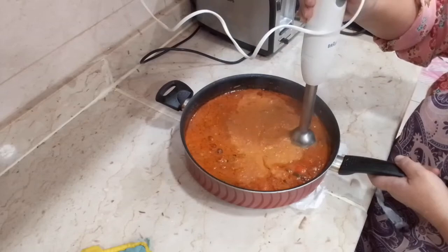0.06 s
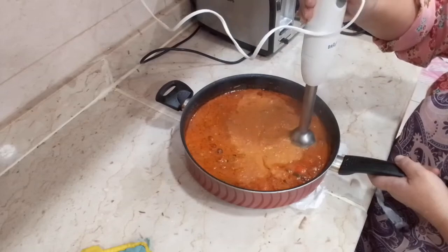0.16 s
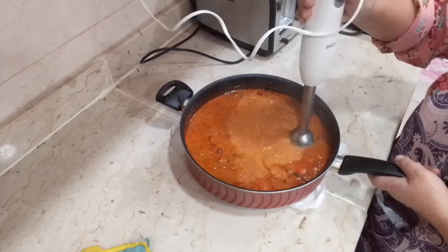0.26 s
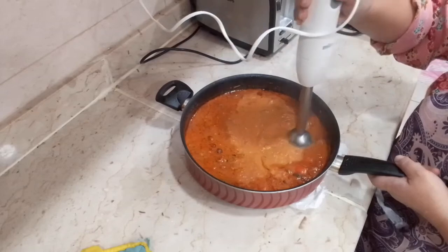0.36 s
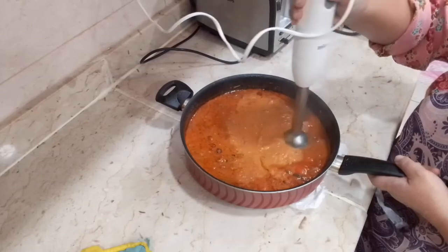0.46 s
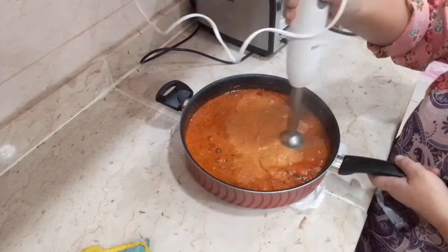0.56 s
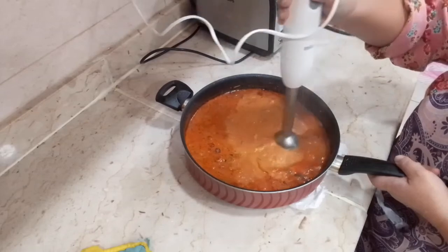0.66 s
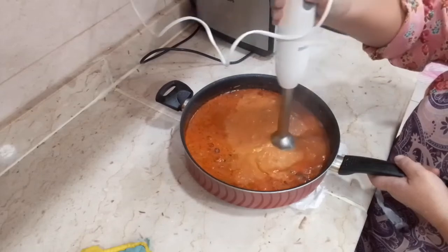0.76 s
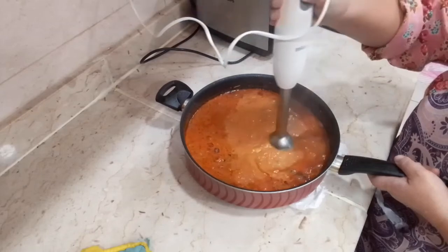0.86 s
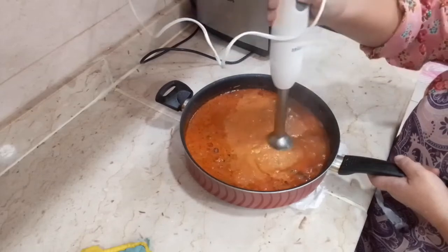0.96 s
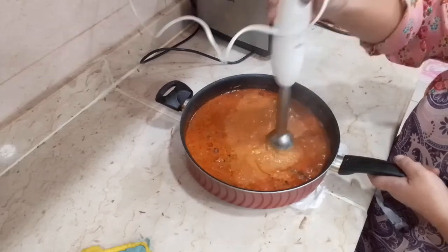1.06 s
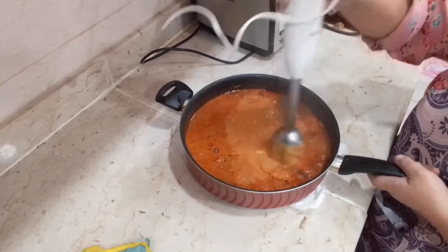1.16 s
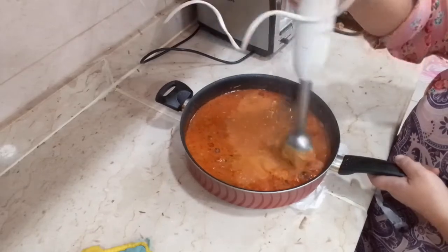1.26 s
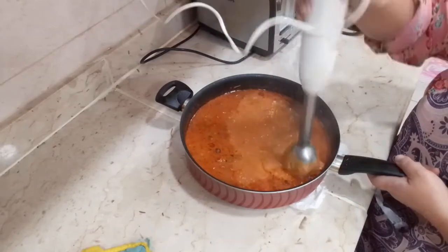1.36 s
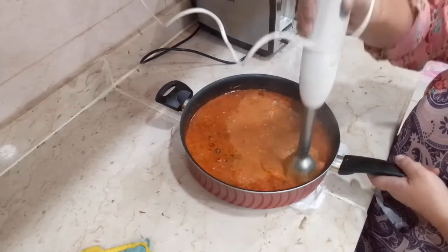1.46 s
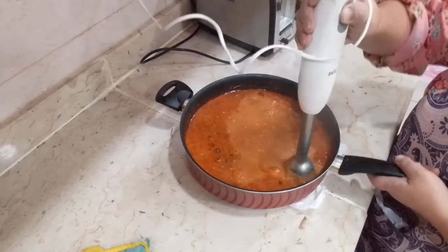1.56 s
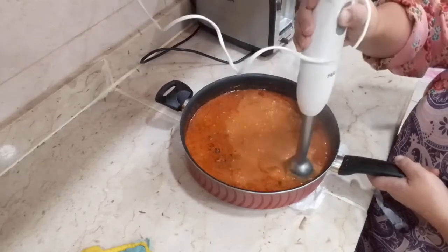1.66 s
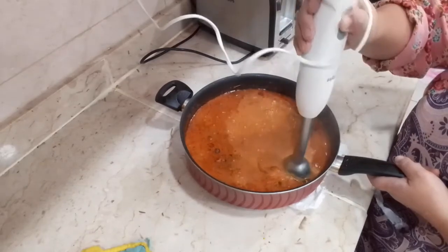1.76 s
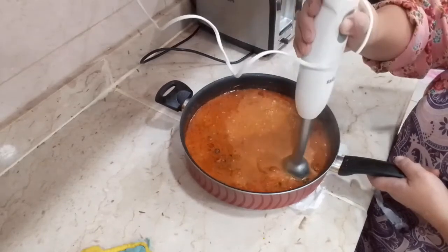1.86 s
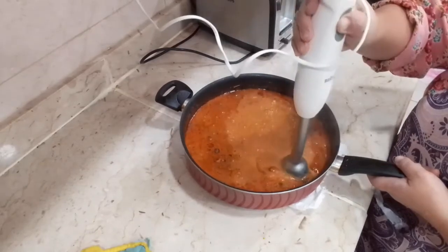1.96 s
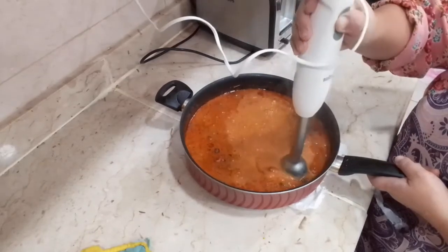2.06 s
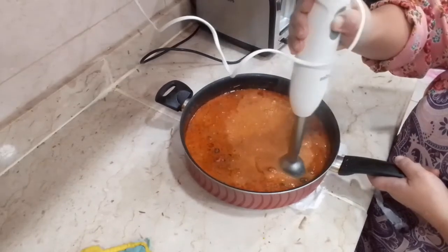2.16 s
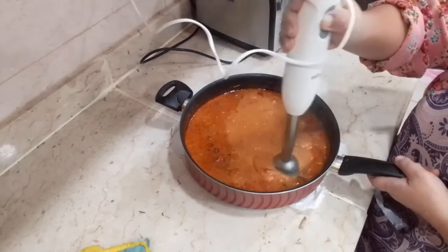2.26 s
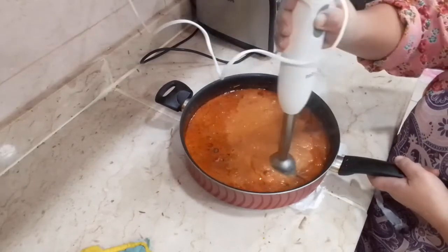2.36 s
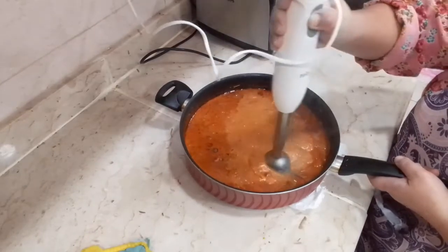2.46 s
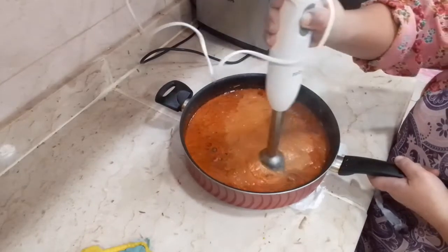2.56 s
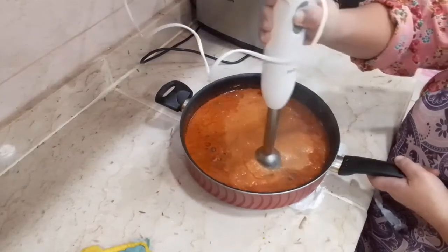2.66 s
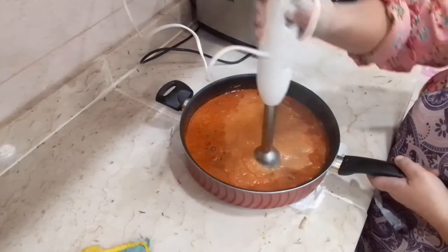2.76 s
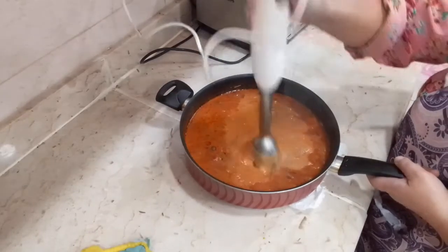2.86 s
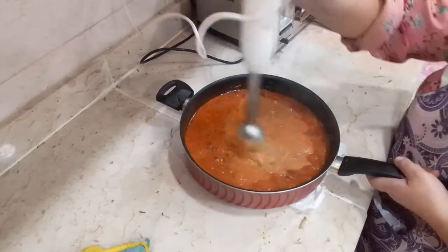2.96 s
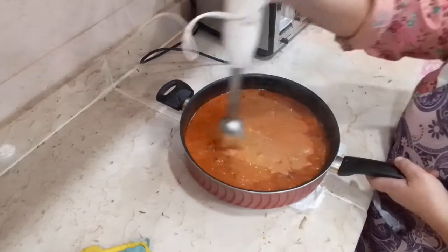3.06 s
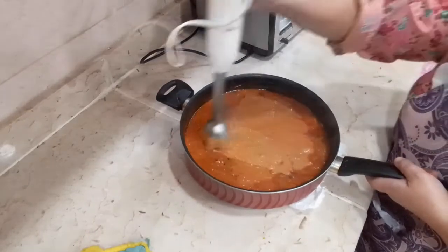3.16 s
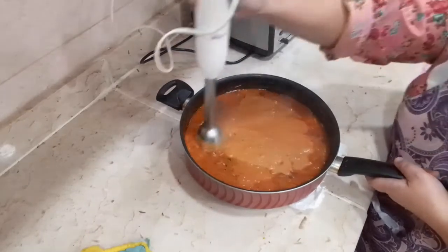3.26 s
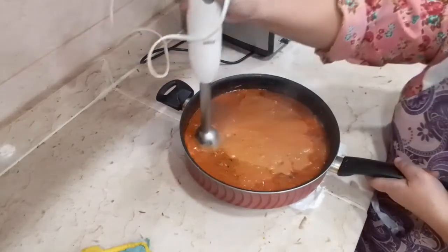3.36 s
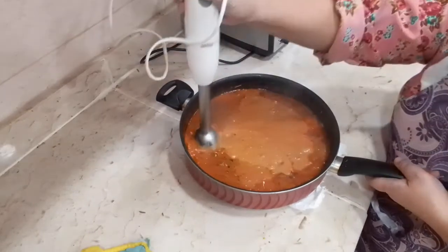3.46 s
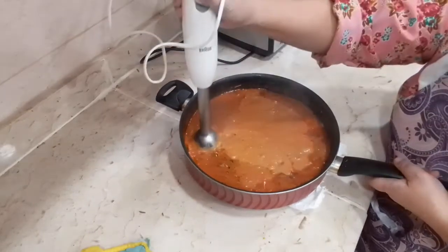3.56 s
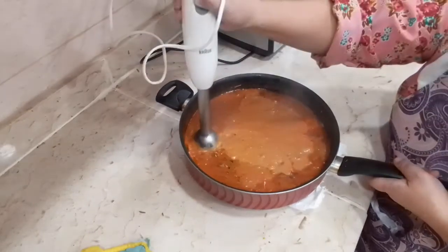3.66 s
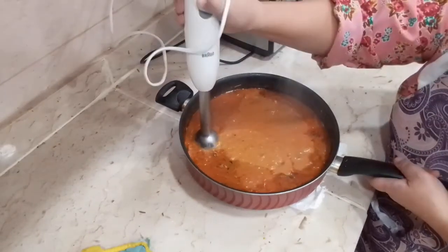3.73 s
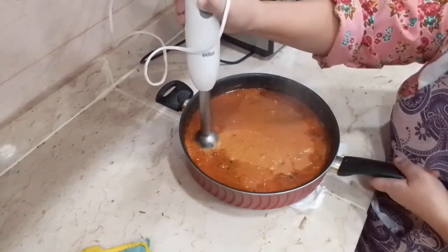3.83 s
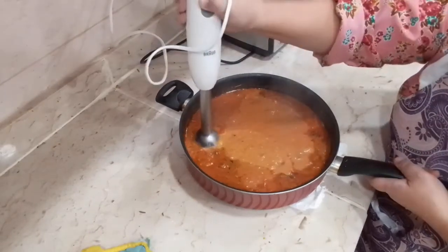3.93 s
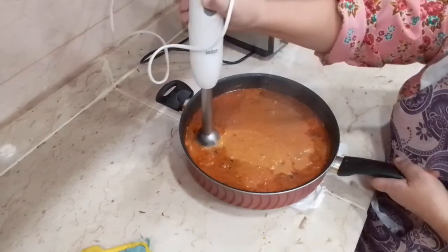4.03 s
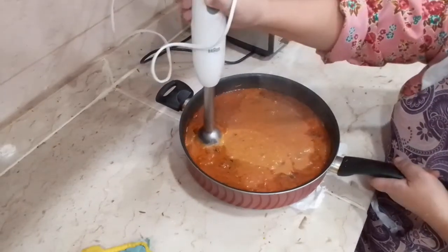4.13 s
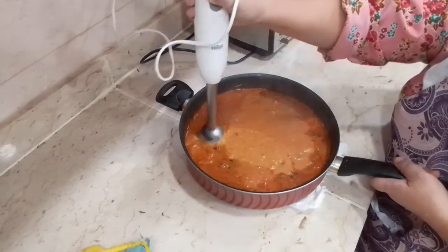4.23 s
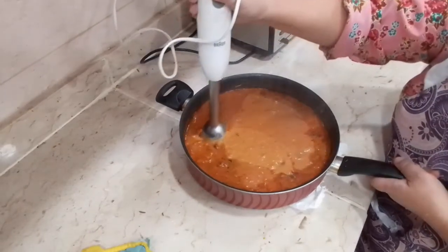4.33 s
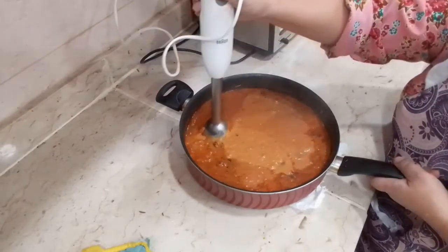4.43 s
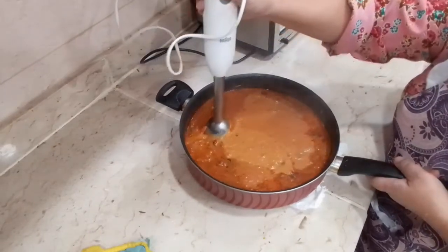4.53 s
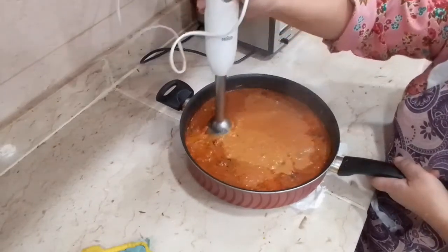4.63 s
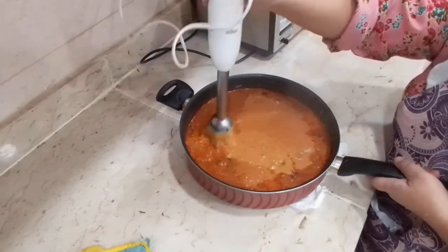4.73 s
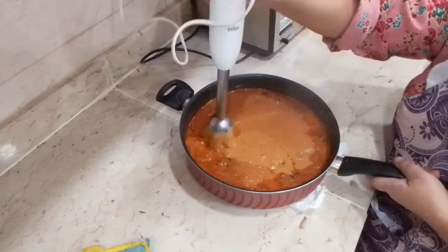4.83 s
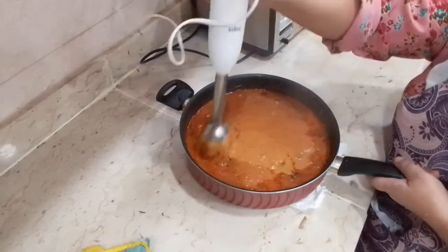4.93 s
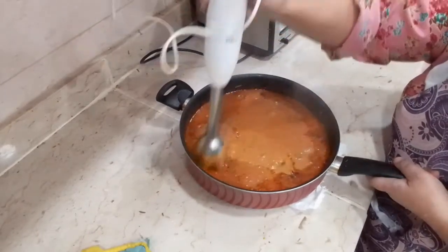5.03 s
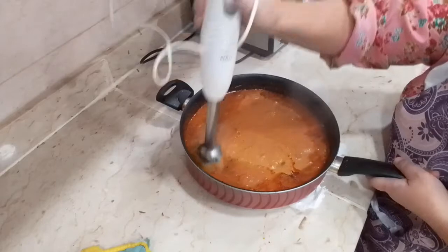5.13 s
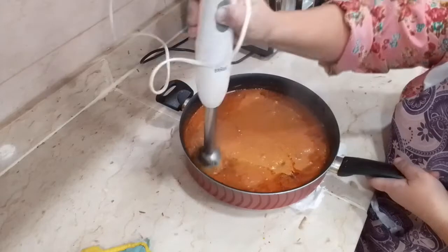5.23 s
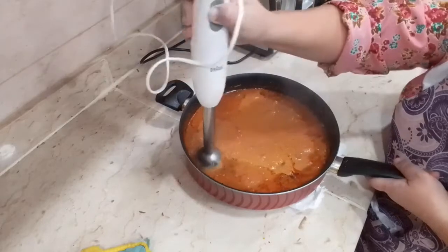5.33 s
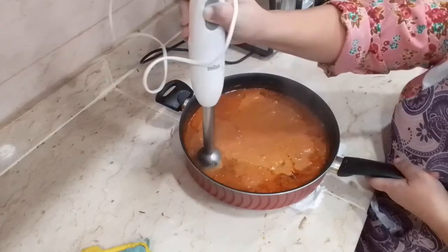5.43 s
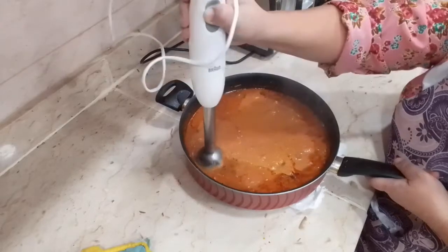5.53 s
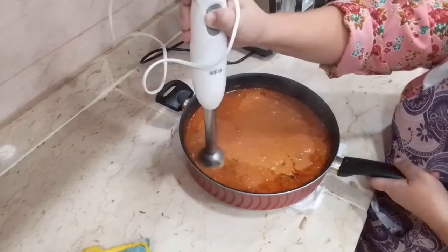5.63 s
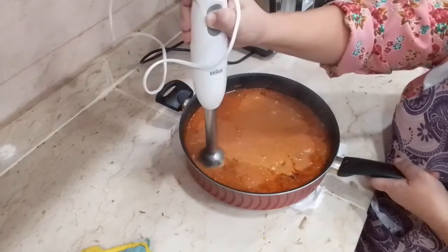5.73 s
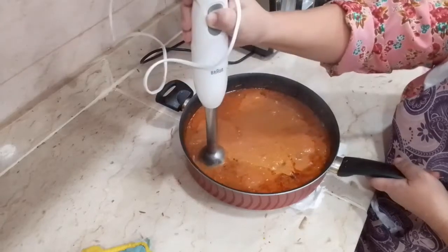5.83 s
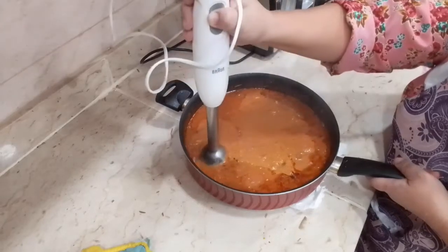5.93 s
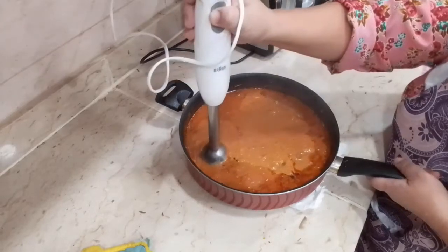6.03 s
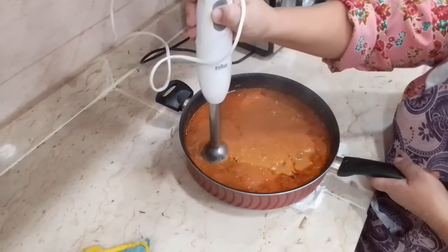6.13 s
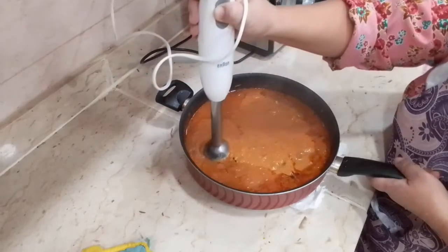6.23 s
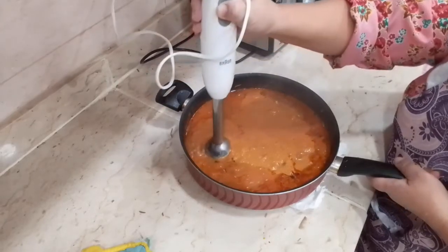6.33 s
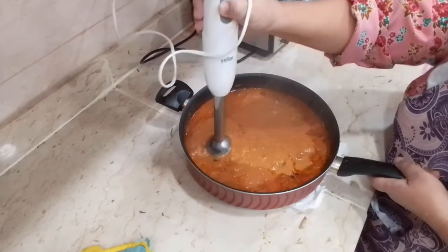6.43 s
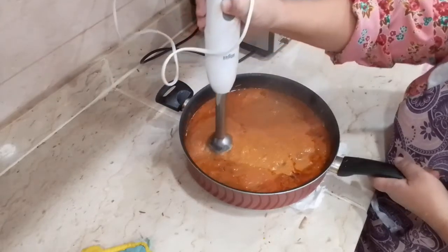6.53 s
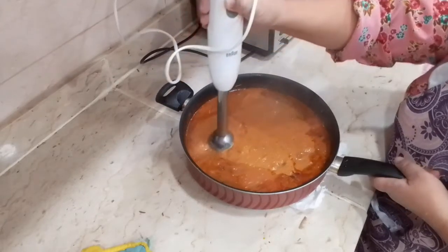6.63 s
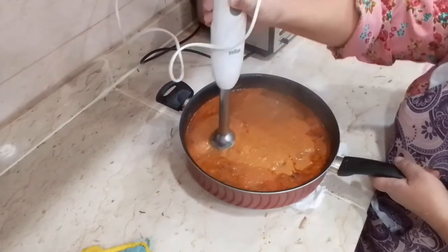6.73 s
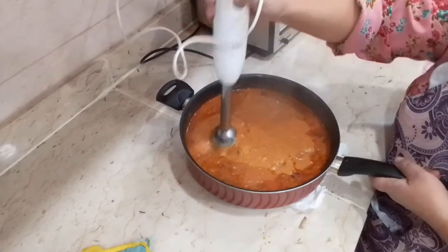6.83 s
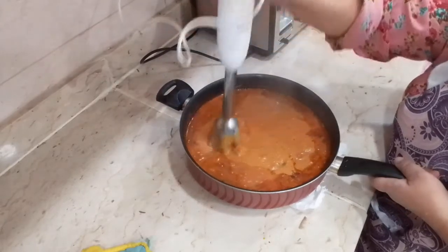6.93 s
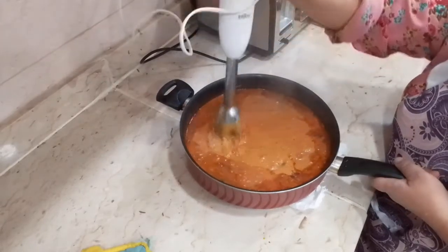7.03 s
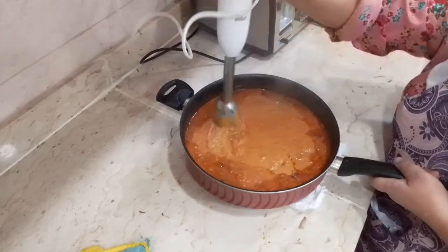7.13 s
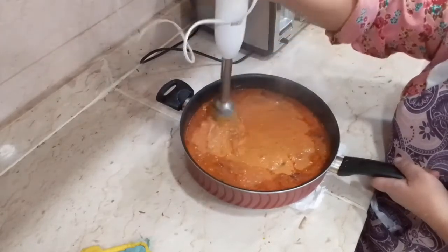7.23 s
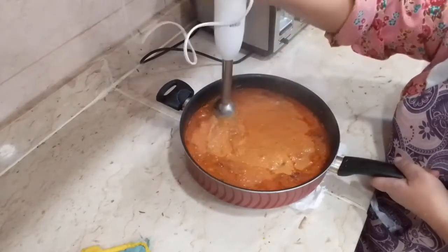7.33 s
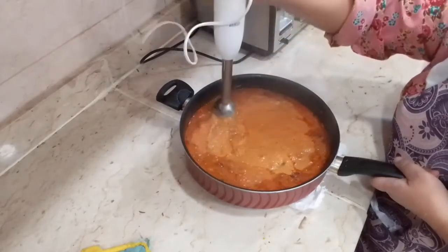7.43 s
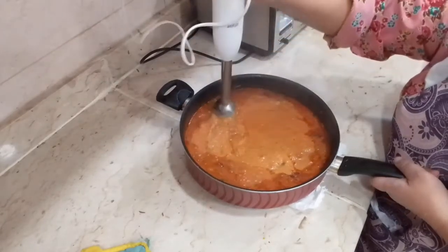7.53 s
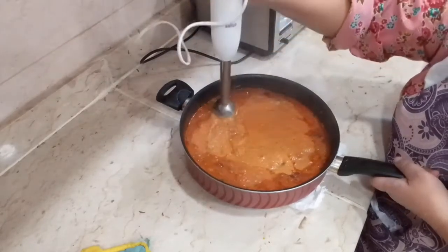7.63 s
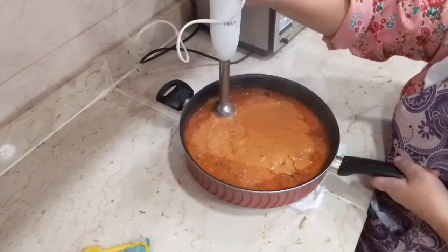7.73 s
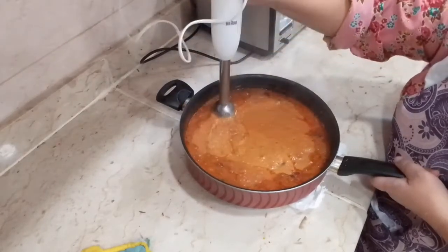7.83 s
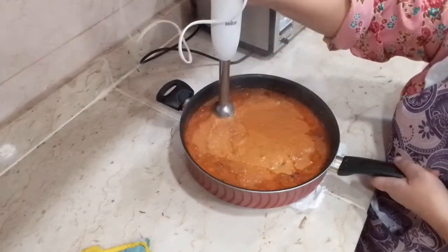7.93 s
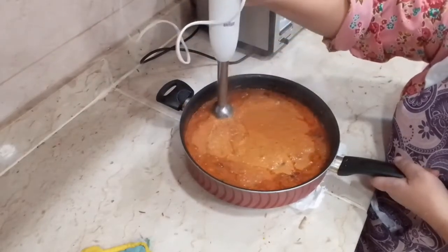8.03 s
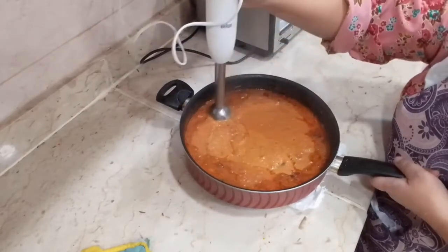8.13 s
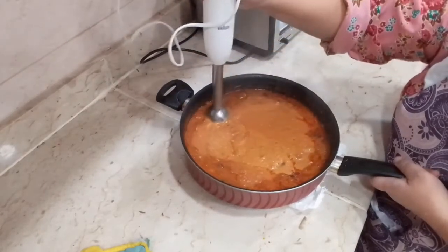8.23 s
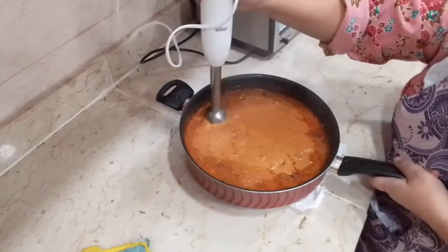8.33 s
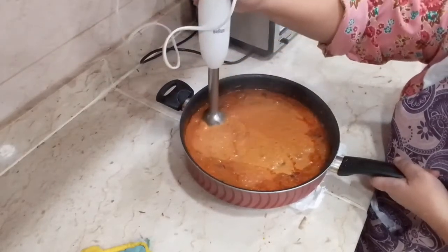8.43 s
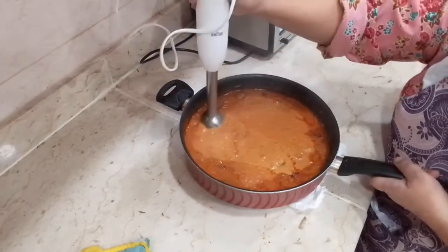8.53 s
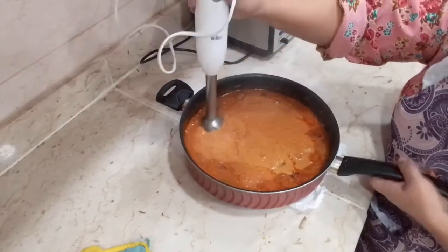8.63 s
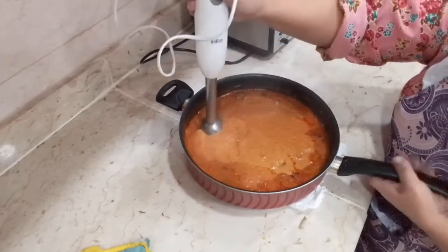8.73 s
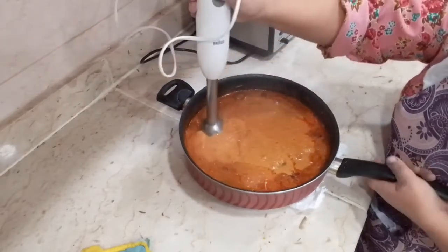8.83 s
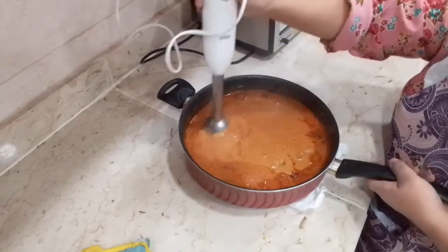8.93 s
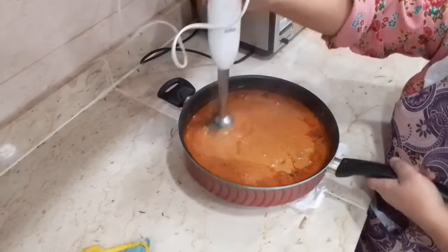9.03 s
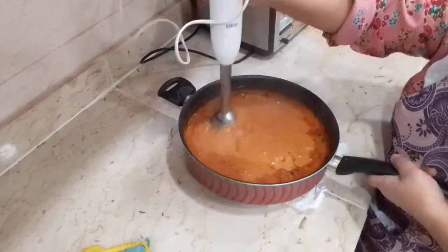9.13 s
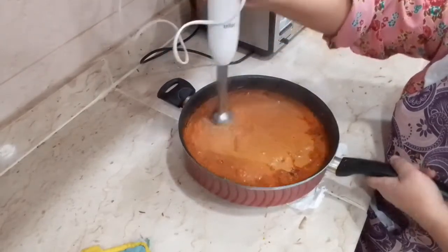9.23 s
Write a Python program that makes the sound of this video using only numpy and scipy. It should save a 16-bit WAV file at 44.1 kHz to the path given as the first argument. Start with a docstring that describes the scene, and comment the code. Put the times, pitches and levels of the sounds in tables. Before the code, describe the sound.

The blender is already running at the start: a raspy, buzzing electric motor with a bright hiss, over thick sauce growling and churning. It is released at about 1.0 s, its whine sliding down in under half a second, with knocks of the metal bell on the pan around 1.2 and 1.6 s. It spins up again from 1.8 to 2.8 s, with a brief airy dip near 2.1 s. The third burst, 3.7 to 4.6 s, is splashier, gulping air and rasping around 4.1 to 4.3 s. Knocks and a short rough pan hum come near 5.1 s. The fourth burst runs 5.5 to 6.7 s, steadier and rising in pitch, then clunks near 7 s. The fifth, 7.6 to 8.7 s, is the wettest, sputtering sharply around 8.4 s. It winds down into light knocks and a last slop by 9.3 s. Low room tone and tiny ticks persist throughout.

```python
"""A stick blender, already running, is pulsed five times in a pan of thick sauce in a tiled kitchen.
In each burst the brush motor sings shaft orders and commutator tones while the blade churns and spits;
at times it gulps air, dips in level and sprays. On release the tones fall as the rotor coasts down.
In the pauses the sauce slops and the bell knocks on the pan; room tone, treble and ticks run throughout."""
import sys
import numpy as np
from scipy import signal
from scipy.fft import rfft, irfft, next_fast_len
from scipy.io import wavfile
from scipy.ndimage import uniform_filter1d, map_coordinates

SR = 44100
rng = np.random.default_rng(int(sys.argv[2]) if len(sys.argv) > 2 else 0)


def master(y):
    """Save y as 16-bit WAV."""
    cut = np.clip(np.atleast_2d(y).T, -1, 1)
    pcm = np.round(cut * 32767)  # scale
    wavfile.write(sys.argv[1], SR, pcm.astype(np.int16))


N = 409248
TOP_HZ = 15700


def amp(db):
    """Decibels to amplitude."""
    return 10 ** (np.asarray(db) / 20)


def unit(x):
    """x scaled to rms 1."""
    return x / np.sqrt(np.mean(x ** 2) + 1e-20)


def seconds():
    """Time of each sample of the scene."""
    return np.arange(N) / SR


def along(points, hz):
    """(hz, value) points interpolated on a log frequency axis."""
    f, v = np.transpose(points)
    return np.interp(np.log(hz + 1), np.log(f + 1), v)


def curves(tables):
    """One value per sample for each column after the time."""
    s, *columns = np.concatenate(tables).T
    return [np.interp(seconds(), s, column) for column in columns]


def wobble(rate_hz):
    """Smooth random curve with rate_hz knots a second."""
    knots = rng.standard_normal(int(N * rate_hz / SR) + 4)
    return map_coordinates(knots, [seconds() * rate_hz])


def filtered(x, response):
    """x times a zero-phase response of frequency."""
    m = next_fast_len(N + SR // 2)
    return irfft(rfft(x, m) * response(np.fft.rfftfreq(m, 1 / SR)), m)[:N]


def colour(points):
    """Gain of a spectrum that is silent outside its ends."""
    return lambda hz: amp(along(points, hz)) * (hz > points[0][0]) * (hz < points[-1][0])


def ringing(modes):
    """Gain of narrow resonances standing on a flat response."""
    return lambda f: 1 + abs(sum(amp(db) * w / (w + 2j * (f - c)) for c, w, db in modes))


def rush(response, patchy_db, lumps=1):
    """Noise of rms 1 with random gain in time-frequency patches."""
    z = signal.stft(lumps * rng.standard_normal(N), nperseg=512)[2]
    field = uniform_filter1d(rng.standard_normal(z.shape), size=6, axis=0)
    field = uniform_filter1d(field, size=10, axis=1)
    patchy = signal.istft(z * amp(patchy_db * unit(field)), nperseg=512)[1][:N]
    return unit(filtered(patchy, response))


# room spectrum, relative: freq_hz, density_db_per_hz
ROOM_SPECTRUM = [(20, -10), (45, -18), (70, -10), (100, -6.5), (155, -39), (230, -11), (350, 6.5),
                 (600, -9.5), (800, -10), (1140, -24.5), (4750, -34.5), (8580, -56), (12000, -55),
                 (15600, -66)]
ROOM_DB = -52


def room_tone():
    """Steady low-mid noise, strongest around 350 Hz."""
    return amp(ROOM_DB) * rush(colour(ROOM_SPECTRUM), 1.2)


# background treble, drifting from pause to pause: time_s, level_db
SIZZLE_LEVEL = [(1.3, -71), (1.75, -73), (3.2, -70), (3.45, -74), (3.6, -68), (5.05, -93), (5.2, -68),
                (5.5, -72), (7.1, -63), (7.3, -65.5), (7.6, -66), (9.1, -71), (9.28, -82)]
# its spectrum, relative: freq_hz, density_db_per_hz
SIZZLE_SPECTRUM = [(1200, -8), (3000, 0), (5500, -1), (9000, 2.5), (11500, -8), (13500, -16), (15600, -32)]


def background_treble():
    """Band noise whose level drifts."""
    return amp(curves([SIZZLE_LEVEL])[0]) * rush(colour(SIZZLE_SPECTRUM), 1.2)


# room decay: freq_hz, t60_s
KITCHEN_DECAY = [(200, 1), (2000, 0.39), (10000, 0.28)]


def kitchen(x):
    """Reverberation by noise whose every frequency dies at its own speed."""
    hz, t, z = signal.stft(rng.standard_normal(SR // 2), SR, nperseg=256)
    decay_db = -60 * t / along(KITCHEN_DECAY, hz)[:, None]
    tail = signal.istft(z * amp(decay_db), SR, nperseg=256)[1]
    delayed = np.pad(x, (200, 0))
    return signal.fftconvolve(delayed, tail / np.linalg.norm(tail))[:N]


RIPPLE_DB, RIPPLE_HZ = 1.4, 35  # random gain spread; spacing of its knots


def rippled(x):
    """Random fine ripple across frequency makes x slightly uneven in colour, fully so above 1 kHz."""
    knots = rng.standard_normal(SR // RIPPLE_HZ)

    def response(f):
        ripple = map_coordinates(knots, [f / RIPPLE_HZ])
        return amp(RIPPLE_DB * ripple * np.clip(f / 1000, 0, 1))

    return filtered(x, response)


TICKS_PER_S = 14
TICK_DB, TICK_SPREAD_DB, TICK_T60_S = -62, 3, .03


def ticks():
    """Tiny bubbles burst on the hot sauce: faint pops at random times, each in its own treble band."""
    out, t = np.zeros(N + SR), np.arange(SR // 40) / SR
    for place, pitch, chance in rng.uniform(size=(round(TICKS_PER_S * N / SR), 3)):
        noise = uniform_filter1d(rng.standard_normal(len(t)), size=14)
        pop = noise * np.sin(2 * np.pi * (4000 + 5500 * pitch) * t) * (1 - np.exp(-t / .001))
        level_db = TICK_DB - TICK_SPREAD_DB * np.log(1 - chance)
        out[round(place * N):][:len(t)] += amp(level_db - 60 * t / TICK_T60_S) * pop
    return out[:N]


HUM_START_S, HUM_HZ, HUM_WIDTH_HZ = 5.14, 1430, 150
HUM_DB, HUM_FADE_DB_PER_S = -49.5, 55


def pan_hum():
    """The knocked pan rim hums roughly on: narrow noise dying away."""
    t = seconds() - HUM_START_S
    noise = rush(lambda f: 1 / (1 + ((f - HUM_HZ) / HUM_WIDTH_HZ) ** 4), 1.8)
    return (t > 0) * amp(HUM_DB - HUM_FADE_DB_PER_S * np.maximum(t, 0)) * noise


CONTACT_TRIM_DB = -13.5  # on every knock and spit
# bell and pan touch, levels before trims:
# start_s, level_db, pitch_ratio, thud_db, ring_db, click_db, counter_thump_db
BELL_KNOCKS = [(0.948, -13, 1.54, -27, -22, -22, -45), (1.183, -11.5, 1.3, -27, -22, -26, -37),
               (1.205, -18.5, 0.94, -9.5, -5, -7, -40.5), (1.495, -36, .95, -8, -24, -24, -25),
               (1.578, -30, 1.06, -8, -24, -26, -7), (1.618, -7, .94, -20, -22, -16, -21),
               (1.628, -23, 1.16, -15, -19, -25, -30), (1.635, -18.5, 0.8, -3, -26, -35, -18),
               (2.991, -10, 1.02, -15, -19, -23, -46), (3.049, -29, 1, -16, -22, -10, -34),
               (3.316, -22, .97, 2, -26, -23, -38), (3.429, -39, .95, -3, -26, -30, -35),
               (3.586, -27.5, 0.9, -7, -37, -20, -29), (4.862, -16, 1.02, -5, -22, -26.5, -43),
               (5.135, -13.5, 1, -33, -15, -7, -53), (5.142, -16.5, 1.02, -8, -17, -13, -48),
               (5.191, -15.5, 0.91, -3.5, -23, -38, -38), (5.262, -26, 0.89, 0, -20, -21, -28),
               (6.899, -12, 1.45, -26, -23, -20, -38), (6.97, -13, .94, -18, -14, -24, -30),
               (7.004, -21, 1.15, -17, -23, -26, -32), (7.113, -29, 0.93, -2, -30, -30, -35),
               (7.309, -13.5, .95, -12, -45, -45, -43), (8.977, -24, 1.25, -26.5, -18, -28.5, -40),
               (9.244, -26, 0.85, -8, -20, -25, -29)]
# pan modes before pitch_ratio and sauce damping: freq_hz, level_db, t60_s
PAN_MODES = [(344, 6, .04), (605, 1, .04), (739, 7, .025), (937, -8, .03), (1247, -3.5, .02),
             (1483, -6, .022), (1970, -7, .02), (2750, -14, .02)]
DAMP_S = 0.019


def knocks():
    """The bell strikes the pan's modes, soon smothered by sauce, with a click and a counter thump."""
    out, t = np.zeros(N + SR), np.arange(SR // 3) / SR
    for s, db, pitch, thud_db, ring_db, click_db, thump_db in BELL_KNOCKS:
        ring = np.zeros(len(t))
        for hz, mode_db, t60 in PAN_MODES:
            # thud weights the lowest mode, ring the upper ones
            share_db = thud_db + 5 if hz < 450 else ring_db + 18.5 if hz > 1100 else 0
            level_db = mode_db + share_db + rng.normal(0, 1)
            ring += amp(level_db - 60 * t / t60) * np.sin(2 * np.pi * pitch * hz * t)
        ring *= np.exp(-(t / DAMP_S) ** 2)
        ring += amp(thump_db - 60 * t / 0.14) * np.sin(2 * np.pi * 85 * t)
        dull_noise = uniform_filter1d(uniform_filter1d(rng.standard_normal(len(t)), size=6), size=3)
        click = amp(click_db + 2 - 60 * t / .04) * dull_noise
        hit = ring * (1 - np.exp(-t / 0.0018)) + click
        out[round(s * SR):][:len(t)] += amp(db + CONTACT_TRIM_DB) * hit
    return out[:N]


# spit bursts, level before trim: start_s, level_db, centre_hz
SPIT_BURSTS = [(1.62, -33.5, 4260), (1.8786, -19, 6940), (2.7792, -24, 5046), (3.048, -31, 8350),
               (3.224, -48, 4530), (3.316, -47, 8500), (3.368, -45, 8540), (3.609, -41, 7160),
               (4.211, -26, 9480), (4.283, -15, 8800), (4.29, -22, 4000), (4.874, -24, 5960),
               (5.137, -47, 7370), (5.297, -50, 6940), (5.571, -15, 6090), (5.78, -19, 6030),
               (5.9193, -24, 6000), (6.05, -20, 5980), (7.42, -38, 6500), (8.453, -13.5, 4480),
               (8.487, -15, 5800), (8.7324, -19, 4570)]
SPIT_T60_S, SPIT_OCTAVES = 0.067, 0.42  # decay; Gaussian half-width of the band


def spits():
    """Droplets spit where the bell breaks the surface: decaying bands of noise."""
    out, t = np.zeros(N + SR), np.arange(SR // 3) / SR
    octaves = np.log2(np.fft.rfftfreq(len(t), 1 / SR) + 1)
    for s, db, hz in SPIT_BURSTS:
        band = np.exp(-((octaves - np.log2(hz)) / SPIT_OCTAVES) ** 2)
        spit = unit(irfft(rfft(rng.standard_normal(len(t))) * band, len(t)))
        level_db = db + CONTACT_TRIM_DB - 60 * t / SPIT_T60_S
        out[round(s * SR):][:len(t)] += amp(level_db) * spit
    return out[:N]


# blade runs dry, then sprays: start_s, dry_s, dip_db, spray_db, hiss_spray_db
AIR_GULPS = [(2.075, 0.052, -5, -2, -3), (4.13, 0.035, -12, 4, -4), (4.245, 0.026, -4.5, -4, -2),
             (8.398, 0.041, -14, 2, -11)]
REFILL_S = 0.074


def gulp_db(dry_share, refill_share):
    """Level dips while the blade runs dry, then recovers exponentially."""
    t, out = seconds(), np.zeros(N)
    for s, dry_s, dip_db, *_ in AIR_GULPS:
        after = np.maximum(t - s - dry_s, 0)
        share = np.where(after > 0, refill_share * np.exp(-after / REFILL_S), dry_share)
        out += dip_db * (t > s) * share
    return uniform_filter1d(out, size=300)


# button presses; base levels before swell, gulps and drifts:
# on_s, off_s, sauce_pace_ratio, hiss_pace_ratio, extra_spatter_fade_db_per_s,
# slosh_db, growl_db, churn_db, spatter_db, hiss_db, orders_db, commutator_db
BUTTON_PRESSES = [(-.3, .985, 1.03, 1.12, 90, -32.5, -31.5, -31, -40, -39.5, -35, -42),
                  (1.756, 2.77, 0.98, 1.04, 83.4, -32.5, -27, -32, -40.5, -41, -38, -44),
                  (3.73, 4.62, 0.98, 0.93, 27.79, -34, -32.5, -29.5, -38, -38, -42, -44),
                  (5.512, 6.71, 0.99, 0.98, 73.5, -40, -33, -33, -40.5, -40.5, -37, -44),
                  (7.605, 8.705, 1.01, 1.034, 49.76, -33.5, -31, -25, -35, -36.5, -41.5, -42.5)]
# over the common swell: time_s, growl_db, slosh_db
GROWL_SLOSH_SWELL = [(0, -1.5, -6.5), (.5, 2.5, -1.5), (.9, 4.5, 0.5), (1.05, 4, 4), (1.8, -5.5, -4),
                     (1.95, -1.5, -4.5), (2.1, -3.5, -2), (2.7, 1.5, -2.2), (3.75, 0.5, 4), (3.82, 5, 2.5),
                     (4.1, 1.5, 4), (4.33, 0, -4.5), (4.55, 2.5, -0.5), (5.55, 1, -0.5), (5.7, 1.5, -7),
                     (5.85, -1.5, -2), (6.1, 0, -1.5), (6.75, 2.5, -1), (6.9, 5.5, 3), (7.63, -3, 9.5),
                     (7.72, -2, 8), (7.85, 2.5, 7.5), (8.2, 1, 9), (8.39, -1, 7.5), (8.7, 1.5, 7)]
# sauce slops as the idle bell is moved: peak_s, slosh_db, growl_db, churn_db
IDLE_SLOPS = [(1.5, -49, -77, -78), (1.655, -48, -48, -63), (3.225, -51, -66, -74),
              (3.369, -48.5, -80, -69), (3.505, -46, -75, -71), (3.62, -66, -80, -80),
              (5.155, -61, -47, -63), (5.29, -48, -49, -70), (5.401, -54, -56, -73), (5.49, -44, -77, -79),
              (7.36, -46.5, -56, -70), (7.47, -51, -54, -70), (9.131, -54, -72, -82),
              (9.28, -43.5, -81, -65)]
SLOP_RISE_DB_PER_S, SLOP_FALL_DB_PER_S = 200, 94
# five-value settings: slosh, growl, churn, spatter, hiss
START_DB, START_S = -24, (0.0082, 0.011, 0.027, 0.034, 0.021)  # offset at switch-on; time constants
SWELL_SHARE = (1, 0.53, 0.81, 0.56, 0.71)
GULP_SHARE = (0.79, 1.1, 0.82, 0.7, 0.94)
REFILL_SHARE = (1.14, 0.98, 1.2, 0.045, 0.063)
COAST_DB_PER_S = (48, 38.6, 39, 18, 4.8)  # before the pace
COAST_DB_PER_S2 = (90, 150, 203, 156, 238)
IDLE_DB = (-59, -71, -87, -93, -80)
CARRY_S = 0.045  # sauce keeps turning after release
SPRAY_RISE_S, SPRAY_S = 0.0086, 0.085


def flow():
    """Levels in dB of slosh, growl, churn, spatter, hiss: rise, hold, gulps, run-down, idle slops."""
    t, swell_db = seconds(), curves(POWERED_MOTOR)[2]
    db = np.zeros((5, N))
    for on, off, sauce_pace, hiss_pace, spatter_fade, *levels in BUTTON_PRESSES:
        late = np.maximum(t - off - CARRY_S, 0)
        paced = late * np.c_[[sauce_pace] * 4 + [hiss_pace]]
        rise = np.exp(-np.maximum(t - on, 0) / np.c_[list(START_S)])
        press = np.c_[levels[:5]] + START_DB * rise
        # the fade steepens as the rotor stops
        press -= np.c_[list(COAST_DB_PER_S)] * paced + np.c_[list(COAST_DB_PER_S2)] * paced ** 2
        press[3] -= spatter_fade * late
        db[:, t >= on] = press[:, t >= on]
    db += np.c_[list(SWELL_SHARE)] * swell_db
    db += [gulp_db(dry, refill) for dry, refill in zip(GULP_SHARE, REFILL_SHARE)]
    db[[1, 0]] += curves([GROWL_SLOSH_SWELL])
    for s, dry_s, _, *spray_db in AIR_GULPS:
        after = np.maximum(t - s - dry_s, 0)
        spray = (1 - np.exp(-after / SPRAY_RISE_S)) * np.exp(-(after / SPRAY_S) ** 2)
        db[3:] += np.c_[spray_db] * spray
    power = amp(db) ** 2 + amp(np.c_[list(IDLE_DB)]) ** 2
    for s, *peak_db in IDLE_SLOPS:
        fall_db = np.where(t < s, SLOP_RISE_DB_PER_S * (s - t), SLOP_FALL_DB_PER_S * (t - s))
        power[:3] += amp(np.c_[peak_db] - fall_db) ** 2
    return 10 * np.log10(power)


# counter top spectrum, relative: freq_hz, density_db_per_hz
RUMBLE_SPECTRUM = [(40, -27), (65, -8.5), (100, 7), (125, -1.5), (160, -15)]
# time_s, level_db
RUMBLE_LEVEL = [(0, 2), (1.9, 3), (2.8, -1), (3.8, 1.5), (5, 1), (6.5, -2.5), (7.8, 0.5), (9.28, 2)]


def counter_rumble(churn_db):
    """The counter top rumbles in a low band that partly follows the churn."""
    level_db = curves([RUMBLE_LEVEL])[0] - 60 + 0.35 * (churn_db + 32) + 1.8 * wobble(8)
    return amp(level_db) * rush(colour(RUMBLE_SPECTRUM), 1.4)


# layer spectra, relative: freq_hz, density_db_per_hz
SLOSH_SPECTRUM = [(110, -69), (180, -26), (245, -6), (323, -2.5), (429, -11), (465, -5.5), (508, -9.5),
                  (605, 0), (900, -34), (1170, -50), (1980, -120)]
GROWL_SPECTRUM = [(560, -29), (700, 11.5), (900, 17), (1100, 16.5), (1300, 7.5), (1500, -45)]
CHURN_SPECTRUM = [(1100, -1.5), (1300, -5.5), (1450, -1.5), (1750, -2.5), (2300, -3.5), (3000, -10),
                  (3400, -13), (3900, -26)]
SPATTER_SPECTRUM = [(2600, -8), (3200, -2), (4500, -1.5), (6200, -4.5), (7000, -7), (10500, -12.5),
                    (13000, -15.5), (14200, -34), (15600, -51)]
# bell rings on the spatter: freq_hz, width_hz, level_db
BELL_RINGS = [(3900, 130, -5), (4550, 130, -5), (5750, 160, -5)]
# bell depth: time_s, shallowness (0 deep, low growl; 1 shallow, high growl)
BELL_DEPTH = [(0, 0.066), (1.0, 0.28), (1.9, 0.24), (2.4, 0.23), (2.8, 0.28), (3.8, 0.61), (4.1, 0.4),
              (4.4, 0.81), (4.8, 0.73), (5.6, 0.47), (6.3, 0.33), (6.8, 0.69), (7.7, 0.36), (8.3, 0.47),
              (8.7, 0.29)]


def sauce(turn, slosh_db, growl_db, churn_db, spatter_db):
    """The blade throws sauce once a turn against the bell; the pan sloshes and droplets fizz."""
    surge = wobble(18)
    throw = (1 + .28 * np.cos(turn)) * amp(1.5 * wobble(320))
    # only the deep growl is left once the churn has died
    shallow = np.clip(curves([BELL_DEPTH])[0], 0, 1) * np.clip((churn_db + 60) / 15, 0, 1)
    deep_growl = rush(lambda f: colour(GROWL_SPECTRUM)(f / .9), 2.07, throw)
    high_growl = rush(lambda f: colour(GROWL_SPECTRUM)(f / 1.2), 2.07, throw)
    growl = np.sqrt(1 - shallow) * deep_growl + np.sqrt(shallow) * high_growl
    growl *= amp(growl_db + .6 * surge)
    churn = amp(churn_db + 0.62 * surge) * rush(colour(CHURN_SPECTRUM), 0.89, throw)
    slosh = amp(slosh_db + 1.2 * wobble(20)) * rush(colour(SLOSH_SPECTRUM), 1.5)
    # spatter flutters harder where it outdoes the churn
    flutter_db = 1.4 + np.clip(spatter_db - churn_db + 8, 0, 8) * .22
    flutter = amp(flutter_db * wobble(150))
    drops = rush(lambda f: colour(SPATTER_SPECTRUM)(f) * ringing(BELL_RINGS)(f), 1.13, flutter)
    return growl + churn + slosh + amp(spatter_db + .5 * surge) * drops


# just after gulps: start_s, rise_s, hold_s, fade_db_per_s, low_db, middle_db, high_db
DRY_RASPS = [(4.172, 0.01, 0.04, 172.8, -33.5, -35.5, -33), (4.281, .002, .012, 250, -37, -41, -44),
             (8.443, 0.0068, 0.033, 150, -50, -36, -41)]
# low, middle and high groups of bell rings: freq_hz, width_hz, level_db
RASP_MODES = [
    [(2130, 350, 0), (2900, 500, -1)],
    [(3850, 330, 0), (4590, 350, 0), (5500, 450, -2)],
    [(8100, 300, -5), (8900, 400, -2), (9650, 300, 1), (10500, 600, -6)],
]


def rasp(turn):
    """Grit struck once a turn rings the bell."""
    t, out = seconds(), np.zeros(N)
    strike = 1 + 3 * np.maximum(np.cos(turn), 0) ** 30
    scrape = strike * amp(wobble(90) + 3 * wobble(900))
    bands = np.array([rush(lambda f: (ringing(m)(f) - 1) ** 1.4, 1.2, scrape) for m in RASP_MODES])
    for s, rise, hold, fade, *db in DRY_RASPS:
        shape = np.clip((t - s) / rise, 0, 1) * amp(-fade * np.maximum(t - s - rise - hold, 0))
        out += shape * (amp(db) @ bands)
    return out


# brush and fan noise, relative: freq_hz, density_db_per_hz
HISS_SPECTRUM = [(5500, -60), (6300, 0), (7000, 3), (7800, 1), (8800, 3), (10000, -3), (11000, -19),
                 (13200, -31), (14000, -45)]
# shell rings: freq_hz, width_hz, level_db
SHELL_RINGS = [(4150, 160, -12), (7300, 260, -7), (8100, 220, -6), (8700, 200, -3), (9400, 240, -6),
               (9900, 260, -9)]
TUBE_HZ = 2800
RING_DB, TUBE_DB, RING_GROWS_DB_PER_S = -12, -12, 59


def hiss(hiss_db, coasting_s):
    """Brush and fan noise through shell resonances and a thin shaft-tube ring, which stand out on coasting."""
    flutter = amp(0.44 * wobble(200))
    air = rush(lambda f: colour(HISS_SPECTRUM)(f) * np.sqrt(ringing(SHELL_RINGS)(f)), 2.1, flutter)
    rings = rush(lambda f: (ringing(SHELL_RINGS)(f) - 1) ** 2, 1.7)
    tube = rush(lambda f: 1 / (1 + ((f - TUBE_HZ) / 100) ** 2), 1.2)
    grow_db = RING_GROWS_DB_PER_S * np.minimum(coasting_s, .3)
    turning = np.clip((hiss_db - IDLE_DB[4] - 5) / 12, 0, 1)
    rings *= amp(RING_DB + grow_db) * turning
    tube *= amp(TUBE_DB + 0.55 * grow_db + 2.5 * wobble(30)) * turning
    return amp(hiss_db) * (air + rings + tube)


# motor under power, one list per press: time_s, shaft_hz, blade_tone_db, churning_swell_db
POWERED_MOTOR = [
    [(0, 179.8, -36, 1), (.25, 182.8, -40, -2), (.5, 183.6, -36.5, -2), (.7, 182.2, -35, -4.5),
     (.87, 179, -33, -0.5), (.985, 180.4, -37, -2.5)],
    [(1.76, 109.5, -57, -1), (1.85, 148.7, -43, 3.5), (1.96, 165.9, -34.5, 1.5), (2.2, 177.4, -36, 3),
     (2.36, 178.1, -61, 0.2), (2.5, 182.9, -35, -1), (2.62, 180.5, -54, 0.3), (2.77, 181.4, -53, 0)],
    [(3.73, 120, -47, -1), (3.85, 147.8, -40, -4), (3.97, 161.5, -29.5, -2), (4.13, 169.4, -31, -2.5),
     (4.24, 178.5, -37, -5), (4.33, 187.1, -32, 0), (4.5, 187.8, -33, -1.1), (4.62, 188.3, -36, -3)],
    [(5.52, 129.5, -58, 5.5), (5.6, 159.2, -40, 3), (5.68, 173.2, -31.5, 2.5), (5.8, 181.4, -33, 0.5),
     (6.05, 182.8, -29, 4), (6.25, 186, -35.5, -0.5), (6.45, 188.1, -38, 1.5), (6.7, 188.3, -34, 1.5)],
    [(7.61, 115.9, -53, -7), (7.69, 150.1, -53, -7), (7.8, 156.5, -29.5, -7.5), (7.87, 166, -40, -8),
     (8.0, 166.7, -39, -5), (8.1, 171.7, -41, -6), (8.3, 173.9, -27, -5.5), (8.42, 173.3, -31.5, -3.5),
     (8.55, 176.9, -33.5, -1.5), (8.7, 181.2, -39, -9)],
]
# tones over their base level: time_s, orders_db, commutator_db
TONE_SWELL = [(0, -1.5, -1), (.3, 2, 3.5), (.55, 1, 2), (.72, 1, 0), (.98, -3, -6), (1.76, -7.5, -19),
              (1.95, -3, -3), (2.2, 1, 3), (2.36, 0, 2), (2.6, -0.5, 0), (2.77, 5, 4), (3.73, -16, -19),
              (3.85, -10, 5), (3.97, -4, -3), (4.1, 1, -6), (4.2, -11, 0), (4.27, -11, 2), (4.33, -0.5, 7),
              (4.62, 2, -1), (5.52, -27, -12), (5.68, -1.5, 0), (5.8, 3, -5), (6.1, 3, 2), (6.45, 2.5, 6),
              (6.7, 3.5, 1), (7.61, -10, -26), (7.69, -1, 1), (7.9, -15, -1), (8.1, 0.5, 1), (8.3, -1, 0),
              (8.55, -2, -6), (8.7, 1, 1)]
DRAG_S = (.21, .23, .24, .25, .22)  # run-down time constant per press
FRICTION_HZ = 30  # brush friction stops the rotor before drag alone would
TONE_GULP_SHARE = (0.56, 0.48, 0.86)  # blade tone, orders, commutator


def shaft():
    """Shaft speed, coasting time and tone levels; on release drag and friction run the rotor down."""
    hz, blade_db, _ = curves(POWERED_MOTOR)
    t, coasting_s, tones_db = seconds(), np.zeros(N), np.zeros((2, N))
    ends_s = [press[0] for press in BUTTON_PRESSES[1:]] + [N]
    swell_db = curves([TONE_SWELL])
    for (on, off, *levels), drag_s, end in zip(BUTTON_PRESSES, DRAG_S, ends_s):
        span, at = (t > off) & (t < end), round(off * SR)
        tones_db[:, t >= on] = (np.c_[levels[-2:]] + swell_db)[:, t >= on]
        coasting_s[span] = t[span] - off
        falling_hz = (hz[at] + FRICTION_HZ) * np.exp(-coasting_s[span] / drag_s) - FRICTION_HZ
        hz[span] = np.maximum(falling_hz, 0)
        blade_db[span] = blade_db[at]
    levels_db = zip([blade_db, *tones_db], TONE_GULP_SHARE)
    return hz, coasting_s, [db + gulp_db(share, share) for db, share in levels_db]


UNDERTONE_START_S, UNDERTONE_RISE_S = .63, .08
UNDERTONE_MULTIPLE, UNDERTONE_DB = 1.77, -32  # of the shaft turn


def undertone(turn, coasting_s):
    """A rough hum a little under the blade tone late in the first press; dies with its run-down."""
    t = seconds()
    gate = np.clip((t - UNDERTONE_START_S) / UNDERTONE_RISE_S, 0, 1) * (t < BUTTON_PRESSES[1][0])
    level_db = UNDERTONE_DB + 1.5 * wobble(18) - 1500 * coasting_s ** 2
    return gate * amp(level_db) * np.sin(UNDERTONE_MULTIPLE * turn)


# shaft orders: multiple, press1_db, press2_db, press3_db, press4_db, press5_db
SHAFT_ORDERS = [(1, -13, -2.5, 0, -12, 5), (3, -1, -1, 1, -1, 2), (4, -0.5, -4, -7, 2, -4),
                (5, 3, 7, 2, 5.5, 4), (6, -6, 6, 11.5, 1.5, 2), (7, -1, -12, 11, -5, -5),
                (8, 0, 4, -8, -7, 1), (9, 2, 1, -3, 1, -2), (10, -5, -4, -5, -6, -18),
                (11, -4, -4, 5, -7, -8)]
BARS = 24  # on the commutator
# vents and shell gain: freq_hz, gain_db
HOUSING_GAIN = [(2000, -30), (2800, 2), (3400, -6), (4000, -24), (5400, -16), (6300, -6), (7300, 2),
                (7650, -3), (8050, 2), (8800, 0), (10000, -6), (11000, -26), (13400, -32), (14200, -55)]
# a small pan radiates little bass: freq_hz, gain_db
PAN_RADIATION = [(20, -38), (150, -64), (190, 0), (260, 3), (20000, -14.5)]


def motor(hz, coasting_s, blade_db, orders_db, bars_db, hiss_db):
    """Sines at shaft orders, plus tones of brushes crossing the commutator bars; also the turn in radians."""
    turn = 2 * np.pi * np.cumsum(hz * (1 + .004 * wobble(30))) / SR
    # two blades beat twice a turn
    blade = amp(blade_db + 1.4 * wobble(16) - 145 * coasting_s) * (1 + 0.22 * wobble(60))
    low = blade * np.sin(2 * turn) + undertone(turn, coasting_s)
    press = np.searchsorted([p[0] for p in BUTTON_PRESSES[1:]], seconds())
    # unbalance gives the other orders, rougher the higher they are
    for k, *press_db in SHAFT_ORDERS:
        level_db = orders_db + np.array(press_db)[press] + 1.4 * wobble(11) - 160 * coasting_s
        rough = 1 + 0.095 * k * wobble(70)
        low += amp(level_db) * rough * np.sin(k * turn + rng.uniform(0, 2 * np.pi))
    # sparking blurs the bar tones more under current
    high = np.zeros(N)
    for k in range(1, 9):
        bar_hz = k * BARS * hz
        blur = np.where(coasting_s > 0, .85 + .75 * wobble(260), .7 + .95 * wobble(450))
        high += amp(along(HOUSING_GAIN, bar_hz)) * blur * np.sin(k * BARS * turn) * (bar_hz < TOP_HZ)
    level_db = np.where(coasting_s > 0, hiss_db + 1 - 18 * coasting_s, bars_db)
    return filtered(low, colour(PAN_RADIATION)) + amp(level_db) * high, turn


def scene():
    """Motor, sauce and knocks in a tiled kitchen."""
    *sauce_db, hiss_db = flow()
    shaft_hz, coasting_s, tones_db = shaft()
    tones, turn = motor(shaft_hz, coasting_s, *tones_db, hiss_db)
    hits = knocks() + spits() + ticks()
    wet = amp(-9.5) * kitchen(hits) + amp(-21) * kitchen(tones)
    noises = sauce(turn, *sauce_db) + counter_rumble(sauce_db[2]) + hiss(hiss_db, coasting_s) + rasp(turn)
    background = room_tone() + background_treble() + pan_hum()
    return (tones + hits + wet + rippled(noises) + background)[None]


def record(dry):
    """Low-pass: nothing above TOP_HZ is kept."""
    return filtered(dry[0], lambda hz: hz < TOP_HZ)[None]


dry = scene()
out = record(dry)
master(out)
```